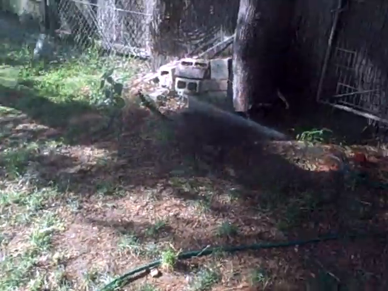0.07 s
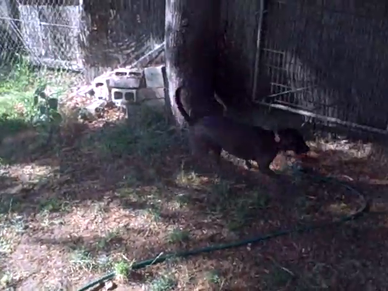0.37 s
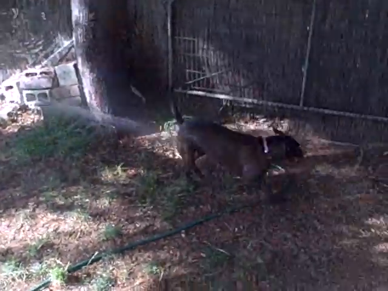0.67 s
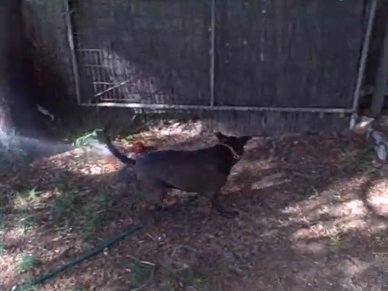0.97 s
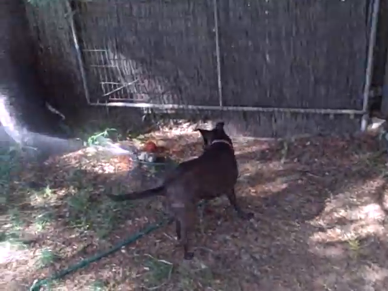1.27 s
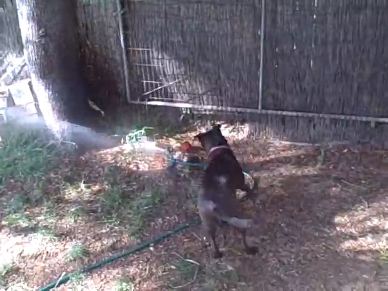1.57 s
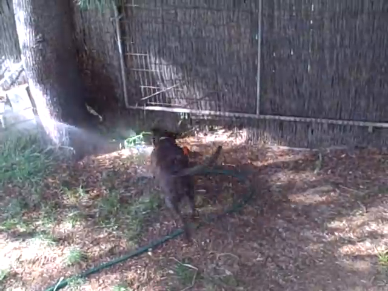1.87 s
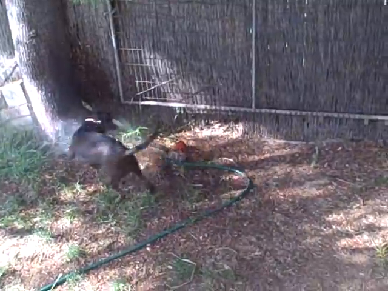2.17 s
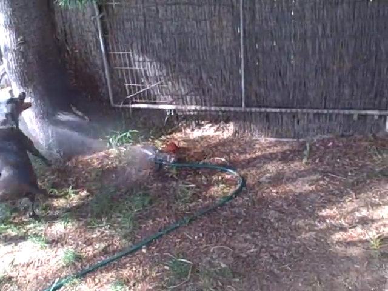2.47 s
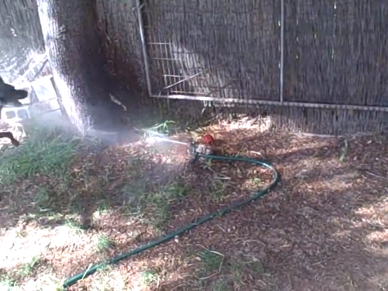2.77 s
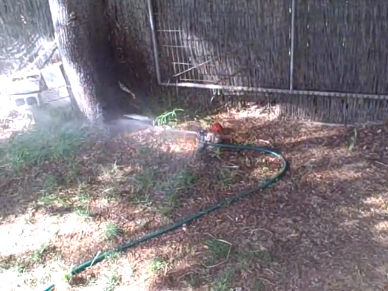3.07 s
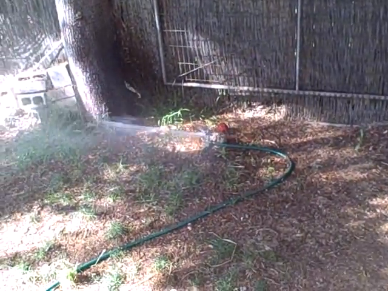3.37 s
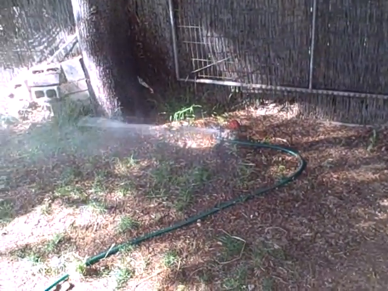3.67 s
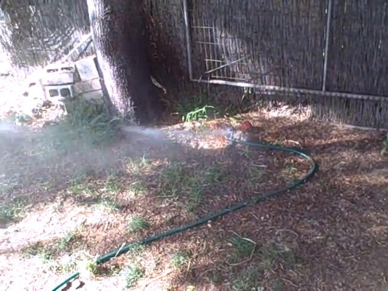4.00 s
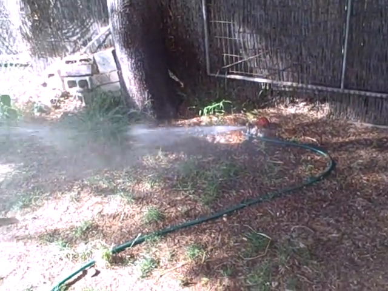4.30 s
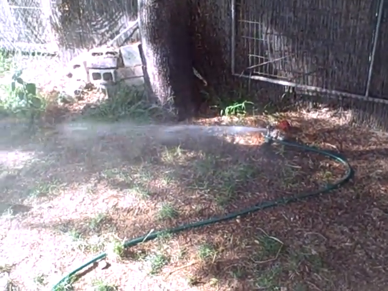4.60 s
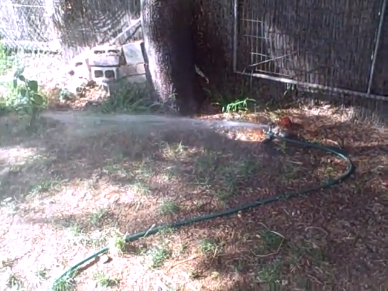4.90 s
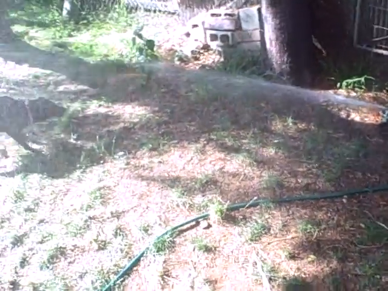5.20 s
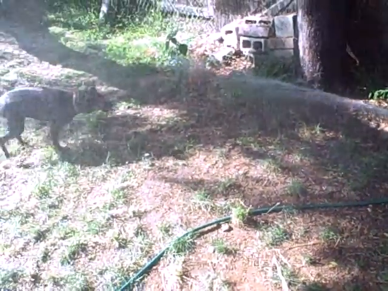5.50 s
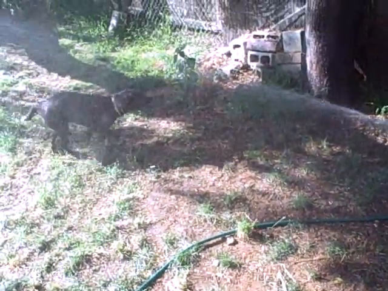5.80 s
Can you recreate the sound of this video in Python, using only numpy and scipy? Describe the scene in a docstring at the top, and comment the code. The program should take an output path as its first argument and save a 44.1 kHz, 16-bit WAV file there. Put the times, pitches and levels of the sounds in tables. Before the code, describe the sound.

Water hisses from a yard sprinkler that ticks steadily, races for a couple of seconds and slows again. Almost at once a dog catches the jet in its mouth, splashing and gurgling. A faint bird calls, then the dog returns with several wet snaps. It finishes with a quick head shake of slapping ears and dull collar clicks. Low, distant traffic hums underneath, and the fence adds a slight echo.

```python
"""An impact sprinkler hisses in a fenced yard; its arm chops the jet into spurts, slowly one way and
fast on the way back. A dog twice snaps at the jet, which rushes in its mouth, splatters off its
muzzle and gurgles in its throat, while its paws thud on the soil. Then it shakes its head: wet ears
slap and the collar clicks. A far bird whistles over the low traffic hum of the neighbourhood."""
import sys
import numpy as np
from scipy import signal
from scipy.fft import rfft, irfft, next_fast_len
from scipy.io import wavfile
from scipy.ndimage import map_coordinates

SR = 44100
rng = np.random.default_rng(int(sys.argv[2]) if len(sys.argv) > 2 else 0)


def to_wav(sig):
    """Store sig (one row per channel, or 1-D mono) as 16-bit WAV at the path in sys.argv[1].

    Samples outside -1..1 are clipped; the rate is SR.
    """
    pcm = np.clip(np.atleast_2d(sig), -1, 1) * 32767
    pcm = np.round(pcm).astype(np.int16)
    wavfile.write(sys.argv[1], SR, pcm.T)  # frames by channels


N = 257984

# spectrum of water shattering on the muzzle: freq_hz, level_db
MUZZLE_SPLATTER = [(100, -27), (500, -19), (900, -11.5), (2000, -4), (4000, -2), (6000, -2), (8000, -4.5),
                   (10000, -9.5), (12500, -10), (15500, -10)]
SHAKE_START_S = 4.7391


def amp(db):
    """Decibels to gain."""
    return 10 ** (np.asarray(db) / 20)


def unit(x):
    """Scale to rms 1."""
    return x / np.sqrt(np.mean(np.abs(x) ** 2) + 1e-20)


def along(points, hz):
    """Read a curve of (freq_hz, value) points on a log frequency axis."""
    freqs, values = np.transpose(points)
    return np.interp(np.log(hz + 1), np.log(freqs + 1), values)


def clock():
    """The time of every sample, in seconds."""
    return np.arange(N) / SR


def wobble(rate):
    """A smooth random curve with rate knots a second."""
    return map_coordinates(rng.standard_normal(int(N * rate / SR) + 4), [clock() * rate])


def filtered(x, response):
    """Shape x with a gain given as a function of frequency."""
    size = next_fast_len(N + 8192)
    return irfft(rfft(x, size) * response(np.fft.rfftfreq(size, 1 / SR)), size)[:N]


def spray(spectrum, grain_db):
    """Coloured noise at rms 1, roughened in tiny grains like a dense rain of uneven impacts."""
    drops = rng.standard_normal(N) * amp(grain_db * np.repeat(rng.standard_normal(N // 16 + 1), 16)[:N])
    return unit(filtered(drops, lambda hz: amp(along(spectrum, hz))))


def gate(start, end, edge_s):
    """Sample indices and a soft-edged envelope from start to end."""
    i = np.arange(max(0, int((start - 2 * edge_s) * SR)), min(N, int((end + 2 * edge_s) * SR)))
    ramp = lambda s: np.clip(.5 + .5 * s / edge_s, 0, 1)
    return i, ramp(i / SR - start) * ramp(end - i / SR)


def gushes(rows, edge_s):
    """Envelope of gushes that start quickly and sag: start_s, end_s, level_db, sag_db_per_s."""
    out = np.zeros(N)
    for start, end, db, sag in rows:
        i, shape = gate(start, end, edge_s)
        out[i] += shape * amp(db - sag * (i / SR - start))
    return out


def phase(i, start, end, from_hz, to_hz):
    """Phase of a glide over the samples i."""
    return 2 * np.pi * np.cumsum(np.interp(i / SR, [start, end], [from_hz, to_hz])) / SR


def churn(width_hz):
    """The wandering complex amplitude of a resonance that turbulence drives."""
    lowpass = lambda hz: 1 / (1 + (hz / width_hz) ** 2)
    return unit(filtered(rng.standard_normal(N), lowpass) + 1j * filtered(rng.standard_normal(N), lowpass))


def resonate(rows, width_hz, edge_s):
    """Bursts of noise in a resonance of steady pitch: start_s, end_s, level_db, pitch_hz."""
    drive, out = churn(width_hz), np.zeros(N)
    for start, end, db, hz in rows:
        i, shape = gate(start, end, edge_s)
        ring = np.real(drive[i] * np.exp(1j * phase(i, start, end, hz, hz)))
        out[i] += amp(db) * shape * unit(ring)
    return out


def hollow(hz, width_hz):
    """Turbulence in a resonance whose pitch is given for every sample, rms 1."""
    return unit(np.real(churn(width_hz) * np.exp(2j * np.pi * np.cumsum(hz) / SR)))


def jet_course():
    """Level and side-on share of the turning jet at every sample."""
    # the free jet: time_s, level_db, side_share (0 thin, 1 broad)
    course = [(0, -41.7, .9), (.7, -42.7, .6), (.9, -43, 0), (1.3, -41, 0.12), (1.8, -40.5, 0.1),
              (1.93, -44.5, 0.04), (2.1, -40, 0), (2.6, -37.3, .03), (3.2, -39.8, 0.87), (4.1, -39.9, 1),
              (4.5, -41, 1), (5.85, -40.5, .6)]
    s, db, side = np.transpose(course)
    return np.interp(clock(), s, db), np.clip(np.interp(clock(), s, side), 0, 1)


def jet():
    """The nozzle hisses; its colour shifts as the sprinkler head turns."""
    # the jet's thin colour and its broad side-on colour: freq_hz, level_db
    thin_spectrum = [(400, -13), (1500, -9.5), (2800, -8.5), (3600, -1), (4200, -4.5), (5000, -2.5),
                     (6100, -4.5), (7000, -0.5), (8100, -4.5), (8800, -1.5), (9600, -2.5), (12000, -4.5),
                     (14000, -3), (15500, -3)]
    broad_spectrum = [(400, -21), (1500, -11.5), (2800, -12), (3500, -3.5), (4400, -7), (5200, -2),
                      (6100, -5), (7100, 0), (7900, -4), (8700, 2.5), (9500, -1.5), (10500, -2.5),
                      (12300, -6), (15500, -5)]
    # the jet whistles at some angles of the head: start_s, end_s, level_db, pitch_hz
    whistles = [(0, .3, -55, 8700), (.9, 1.9, -51.5, 8800), (.9, 1.9, -56.5, 5080), (3.5, 4.6, -55, 9350)]
    db, side = jet_course()
    level = amp(db + .28 * wobble(7.1))
    whistle = resonate(whistles, width_hz=290, edge_s=.1)
    thin = np.sqrt(1 - side) * spray(thin_spectrum, grain_db=.5)
    broad = np.sqrt(side) * spray(broad_spectrum, grain_db=2.5)
    return whistle + level * (thin + broad)


def neighbourhood():
    """Far traffic hums in a low, steady wash of noise."""
    # spectrum of the wash: freq_hz, level_db
    wash_spectrum = [(20, -2), (50, -3.5), (75, -1.5), (97, 0), (125, -3), (170, -6), (260, -5.5),
                     (400, -10.5), (700, -7), (1400, -12.5), (2300, -8.5), (3000, -14), (8000, -34)]
    # far traffic swells: start_s, end_s, level_db, pitch_hz
    swells = [(.05, 0.9, -59, 119.4), (.78, 1.04, -57, 113.8), (1.02, 3.7, -62.5, 93)]
    hum = resonate(swells, width_hz=13, edge_s=.06)
    return hum + amp(-51 + .61 * wobble(3.03)) * spray(wash_spectrum, grain_db=1)


def arm(follow_jet=.6, scatter_db=.3, trail_db=-8, trail_t60_s=.051):
    """The arm sits in the jet for a moment and fans it into a spurt; droplets trail behind."""
    # runs of even strokes, slow forward and fast on the return: first_s, last_s, period_s, level_db
    sweeps = [(.0215, 2.409, .149, -30), (2.465, 2.9, .0555, -30.8), (2.967, 3.429, .058, -30.3),
              (3.486, 4.325, .056, -29.8), (4.450, 5.793, .149, -29)]
    # colour of a spurt: freq_hz, level_db
    spurt_spectrum = [(300, -18), (1500, -16.5), (2700, -15), (3600, -7), (4500, -8.5), (5300, -2),
                      (6500, 0), (8000, -2), (9300, -2.5), (10500, -6.5), (12300, -8), (14200, -8),
                      (15500, -6.5)]
    power, t = np.zeros(N), clock()
    jet_db, _ = jet_course()
    lift_db = follow_jet * (jet_db - jet_db.mean())
    for first, last, period, sweep_db in sweeps:
        # on the fast return the arm swings short and eases into the water
        dwell_s, edge_s = (.0245, .0072) if period < .1 else (.0215, .0026)
        for s in np.linspace(first, last, round((last - first) / period) + 1):
            db = sweep_db + lift_db[int(s * SR)] + scatter_db * rng.standard_normal()
            start, end = s - dwell_s / 2, s + dwell_s / 2
            i, shape = gate(start, end, edge_s)
            power[i] += (amp(db) * shape) ** 2
            trail = slice(int(end * SR), int(end * SR) + SR // 8)
            power[trail] += amp(db + trail_db - 60 * (t[trail] - end) / trail_t60_s) ** 2
    flutter = amp(-2 + .78 * wobble(400))
    return np.sqrt(power) * flutter * spray(spurt_spectrum, grain_db=.5)


def mouth(upper_ratio=1.55, teeth_hz=3250, mid_jaw_hz=2530, splatter_db_per_octave=6):
    """The jet rings the dog's opening and closing mouth and splatters off the muzzle."""
    # gushes weaken as the mouth fills: start_s, end_s, splatter_db, cavity_db, sag_db_per_s
    mouthfuls = [(.345, 0.475, -31.5, -31, 4), (.491, 0.531, -30.5, -34, 35), (.543, .626, -30.5, -41, 22),
                 (2.044, 2.111, -32.5, -39, 25), (2.128, 2.267, -35.5, -36.5, 16),
                 (2.288, 2.385, -31.8, -33.5, 115), (2.507, 2.546, -34.5, -47, 20),
                 (2.791, 2.925, -42, -48, 15)]
    # mouth opening as the pitch of its cavity, one curve a bite: time_s, pitch_hz
    jaw_curves = [
        [(.345, 2550), (.392, 1650), (.425, 2750), (.47, 3190), (.51, 2910), (.55, 3797), (.62, 2500)],
        [(2.06, 3500), (2.09, 2048), (2.14, 2250), (2.2, 1651), (2.3, 2747), (2.38, 1600), (2.52, 3000),
         (2.8, 2000)],
    ]
    # the cavity rings best half open: pitch_hz, gain_db
    ring_strength = [(1300, -6), (1900, -0.5), (2700, -.5), (3300, -4.5), (4000, -9)]
    hz = np.interp(clock(), *np.transpose(np.vstack(jaw_curves)))
    ring = hollow(hz, width_hz=640)
    ring += amp(-8) * hollow(hz * upper_ratio, width_hz=480)
    ring += amp(-7.5) * hollow(np.full(N, teeth_hz), width_hz=400)  # the rasp on the teeth holds its pitch
    cavity = gushes([(start, end, db, sag) for start, end, _, db, sag in mouthfuls], edge_s=.006)
    cavity *= amp(along(ring_strength, hz) - 2.3 + 1.4 * wobble(190))
    splatter = gushes([(start, end, db, sag) for start, end, db, _, sag in mouthfuls], edge_s=.0078)
    # a wider mouth splatters more
    splatter *= amp(splatter_db_per_octave * np.log2(hz / mid_jaw_hz) + .6 * wobble(120))
    return cavity * ring + splatter * spray(MUZZLE_SPLATTER, grain_db=2.2)


def throat():
    """Pooled water gurgles in the throat and comes in gulps."""
    # the chest booms under the first bite: start_s, end_s, level_db, pitch_hz
    chest_boom = [(.41, .53, -49, 260)]
    # churning water, one curve a bite: time_s, level_db, pitch_hz
    gurgles = [
        [(.355, -44, 1200), (.41, -37.5, 880), (.46, -46, 901), (.475, -36, 870), (.505, -35.5, 930),
         (.52, -43, 918), (.585, -48, 1050)],
        [(2.08, -34, 2200), (2.104, -37, 1848), (2.12, -52, 1500), (2.195, -44, 1080), (2.255, -45.5, 688),
         (2.28, -56, 800), (2.38, -48, 1150)],
    ]
    out = resonate(chest_boom, width_hz=84, edge_s=.004)
    for curve in gurgles:
        s, db, hz = np.transpose(curve)
        i, shape = gate(s[0], s[-1], edge_s=.0036)
        gurgle = hollow(np.interp(clock(), s, hz), width_hz=93)
        out[i] += shape * amp(np.interp(i / SR, s, db)) * unit(gurgle[i])
    return out * amp(-2 + 2.3 * wobble(70))


def paws():
    """Paws thud on the soil."""
    # footfalls: start_s, end_s, level_db, pitch_hz
    thuds = [(.505, .53, -42.5, 50), (1.87, 1.94, -56, 137.4), (2.0, 2.05, -67, 130),
             (2.44, 2.482, -49.5, 147.6)]
    return resonate(thuds, width_hz=22, edge_s=.0127)


def bird():
    """A far bird sings two thin phrases, each a falling slur and a held whistle."""
    # notes: start_s, end_s, level_db, from_hz, to_hz
    notes = [(0.91, .965, -57, 2960, 2270), (1.023, 1.085, -54, 2420, 2470), (1.18, 1.225, -54, 2950, 2290),
             (1.272, 1.365, -54, 2410, 2370)]
    out, waver = np.zeros(N), wobble(90)
    for start, end, db, from_hz, to_hz in notes:
        i, shape = gate(start, end, edge_s=.012)
        whistle = np.sqrt(2) * np.sin(phase(i, start, end, from_hz, to_hz) + .9 * waver[i])
        out[i] += amp(db) * shape * whistle
    return out


def snaps(length_s=.022, upper_ratio=1.6, upper_db=-6, low_cut_hz=560):
    """The jaws snap through the jet, each time with a short hollow plop and a splash."""
    # jaw snaps: start_s, cavity_db, cavity_hz, splatter_db
    chomps = [(2.474, -41, 1372, -43), (2.581, -44, 1753, -35), (2.642, -35.5, 750, -32.5),
              (2.699, -37.5, 1645, -32.5), (2.759, -38, 1680, -33.5)]
    modes = [(s, s + length_s, db + gain_db, hz * ratio)
             for s, db, hz, _ in chomps for ratio, gain_db in [(1, 0), (upper_ratio, upper_db)]]
    plops = resonate(modes, width_hz=300, edge_s=.004)
    # the mouth is too small to radiate bass
    plops = filtered(plops, lambda hz: hz ** 4 / (hz ** 4 + low_cut_hz ** 4))
    splash = gushes([(s, s + length_s, db, 0) for s, _, _, db in chomps], edge_s=.0067)
    return amp(-1.5) * plops + splash * spray(MUZZLE_SPLATTER, grain_db=1.5)


def rustle():
    """A faint, hollow rustle while the dog is off to the side."""
    # bands of the rustle: start_s, end_s, level_db, pitch_hz
    bands = [(3.14, 3.27, -53, 1021), (3.14, 3.23, -54, 1950)]
    return resonate(bands, width_hz=260, edge_s=.02)


def slap_time(slap, gap_s=.09428, quicken_s=.000544):
    """When an ear slap lands; the head shake quickens slightly with each one."""
    return SHAKE_START_S + slap * gap_s - quicken_s * slap ** 2 / 2


def collar(slaps, lag_s=.038, t60_s=.014, fade_db_per_s=4):
    """The collar swings after the ears and clicks dully, starting one swing before the first slap."""
    click_spectrum = [(400, -13), (1200, -7), (3600, 8), (6000, -14), (14000, -19)]  # freq_hz, level_db
    clicks, t = np.zeros(N), clock()
    for slap in range(-1, slaps):
        s = slap_time(slap) + lag_s + .002 * rng.standard_normal()
        db = -34.5 - fade_db_per_s * (s - SHAKE_START_S) + 1.2 * rng.standard_normal()
        i = slice(int(s * SR) + 1, int(s * SR) + SR // 20)
        clicks[i] += amp(db - 60 * (t[i] - s) / t60_s)
    return clicks * spray(click_spectrum, grain_db=0)


def ears(slaps, attack_s=.0008, crack_db=-13, crack_t60_s=.009, smear_t60_s=.1, smear_ratio=1.2):
    """Each ear slap is a short hollow pop with a wet crack, followed by a smear of wet fur."""
    # the two ears slap in turn: level_db, fade_db_per_s, pitch_hz, smear_db
    ear_pair = [(-25.8, 6, 1340, -5.5), (-20, 4, 775, -13)]
    # modes of the cupped ear: pitch_ratio, level_db, t60_s
    modes = [(1, 0, 0.011), (1.8, -0.5, 0.0077), (2.6, -6, .008)]
    # overall tone of the slaps: freq_hz, gain_db
    tone = [(250, -15.5), (450, -8), (650, 1), (1500, -.5), (4000, -4), (7000, -12)]
    out, t = np.zeros(N + SR), np.arange(SR // 8) / SR
    fur = churn(width_hz=1350)
    onset = 1 - np.exp(-t / attack_s)
    for slap in range(slaps):
        s = slap_time(slap)
        at = round(s * SR)
        db, fade, hz, smear_db = ear_pair[slap % 2]
        db -= fade * (s - SHAKE_START_S)
        hz *= 1 + .0303 * rng.standard_normal()
        # neighbouring modes swing in opposite directions
        pop = sum((-1) ** n * amp(mode_db + rng.normal(0, 1) - 60 * t / t60_s)
                  * np.sin(2 * np.pi * hz * ratio * t) for n, (ratio, mode_db, t60_s) in enumerate(modes))
        smear = unit(np.real(np.roll(fur, at)[:len(t)] * np.exp(2j * np.pi * hz * smear_ratio * t)))
        smear *= amp(smear_db - 60 * t / smear_t60_s)
        crack = amp(crack_db - 60 * t / crack_t60_s) * rng.standard_normal(len(t))
        out[at:at + len(t)] += amp(db) * (pop + crack + smear) * onset
    return filtered(out[:N], lambda hz: amp(along(tone, hz)))


def fence(x, diffuse_db=-13, echo_cutoff_hz=9000):
    """A few distinct echoes and a short diffuse answer from fence, tree and wall."""
    # decay of the diffuse tail: freq_hz, t60_s
    decay = [(200, 0.44), (2000, 0.44), (12000, 0.29)]
    # nearest echoes, off ground, trunk and fence: delay_s, level_db
    bounces = [(.0016, -24.5), (.0072, -21.5), (.011, -18)]
    hz, t, noise = signal.stft(rng.standard_normal(SR // 3), SR, nperseg=256)
    tail = signal.istft(noise * amp(-60 * t / along(decay, hz)[:, None]), SR, nperseg=256)[1]
    delayed = np.pad(x, (SR // 150, 0))
    diffuse = signal.fftconvolve(delayed, tail / np.linalg.norm(tail))[:N]
    taps = lambda f: sum(amp(db) * np.exp(-2j * np.pi * f * delay) for delay, db in bounces)
    echoes = filtered(x, lambda f: taps(f) / (1 + (f / echo_cutoff_hz) ** 2))
    return echoes + amp(diffuse_db) * diffuse


def scene():
    """Sprinkler, dog and bird echo in the yard, over dry paw thuds and hum; mono on both channels."""
    dog = mouth() + snaps() + throat() + rustle() + ears(slaps=12) + collar(slaps=10)
    direct = jet() + arm() + dog + bird()
    mono = direct + fence(direct) + paws() + neighbourhood()
    return np.array([mono, mono])


def record(dry, top_hz=15810):
    """The microphone brightens the very top and passes nothing above its band limit."""
    # treble response: freq_hz, gain_db
    treble = [(12500, -0.5), (14400, 0.5), (15300, 4), (15800, -3)]
    response = lambda hz: amp(along(treble, hz)) * (hz < top_hz)
    return np.array([filtered(channel, response) for channel in dry])


dry = scene()
out = record(dry)
to_wav(out)
```